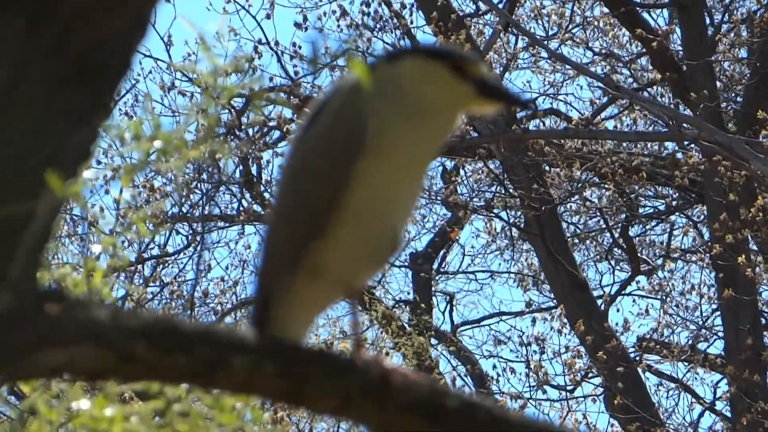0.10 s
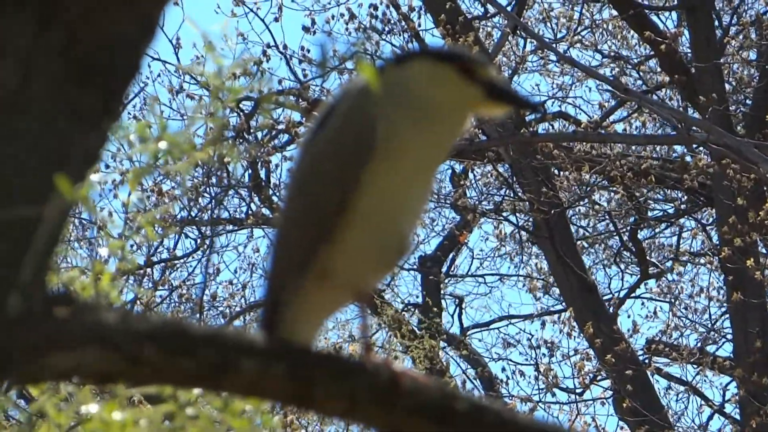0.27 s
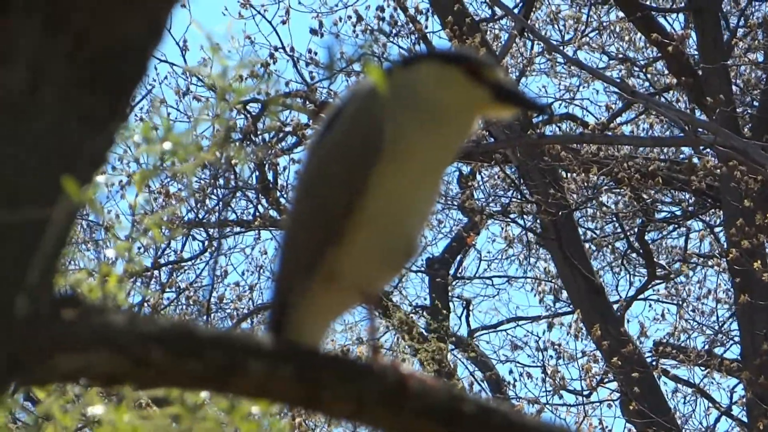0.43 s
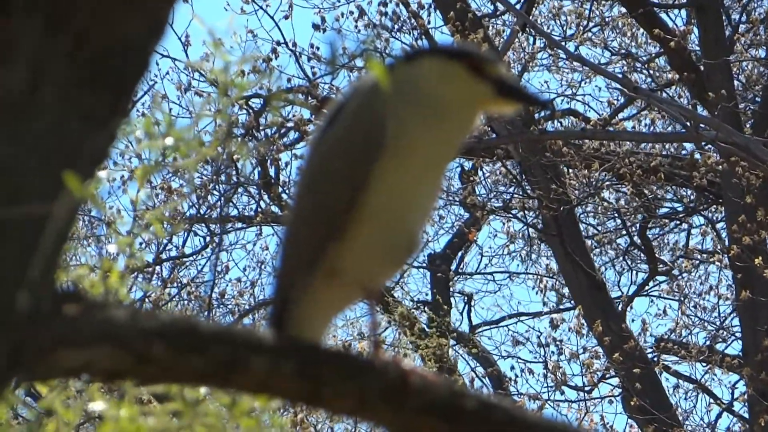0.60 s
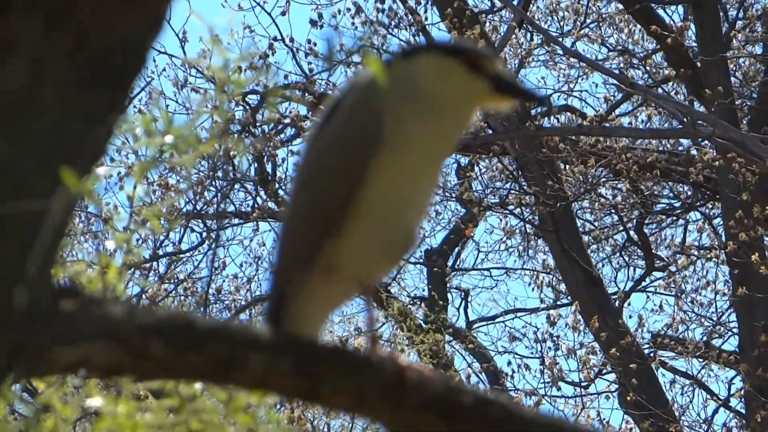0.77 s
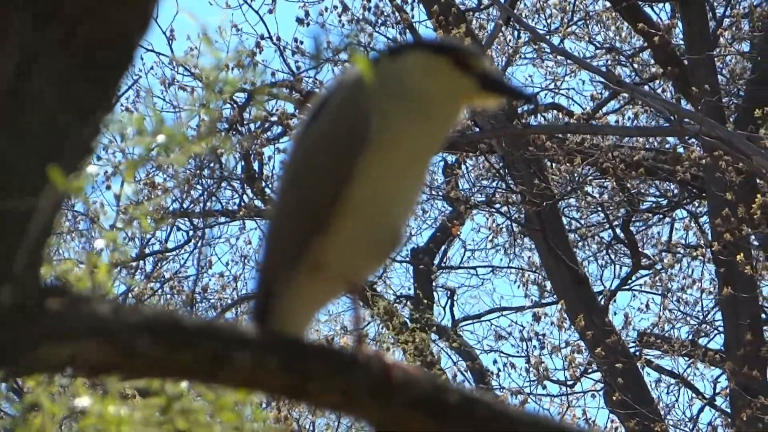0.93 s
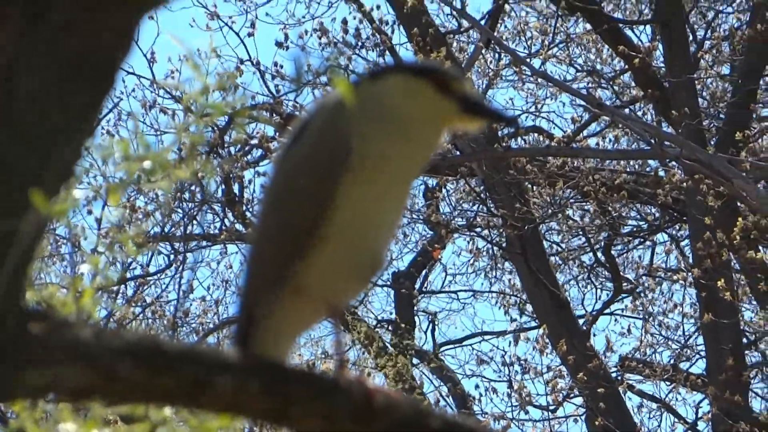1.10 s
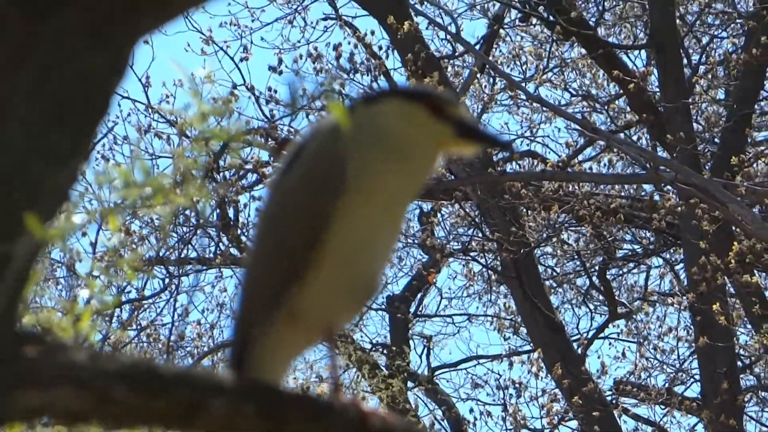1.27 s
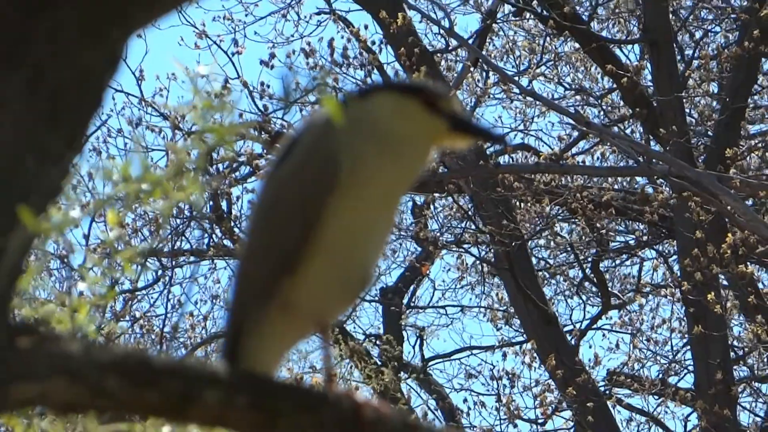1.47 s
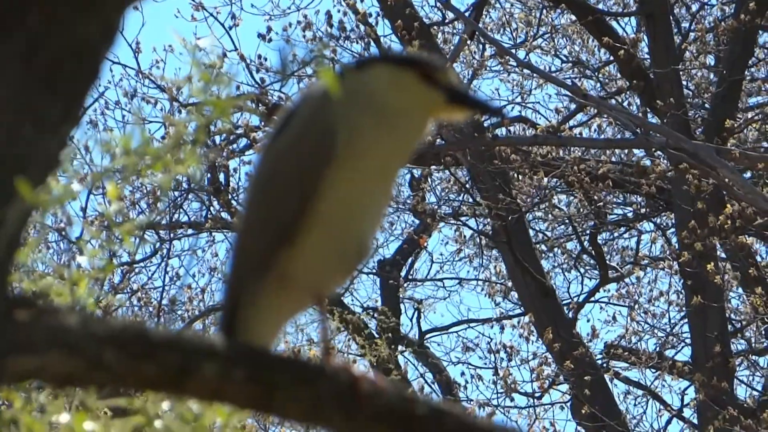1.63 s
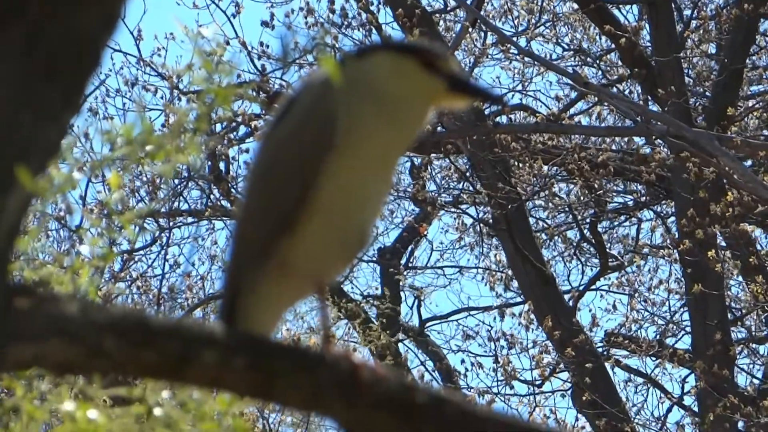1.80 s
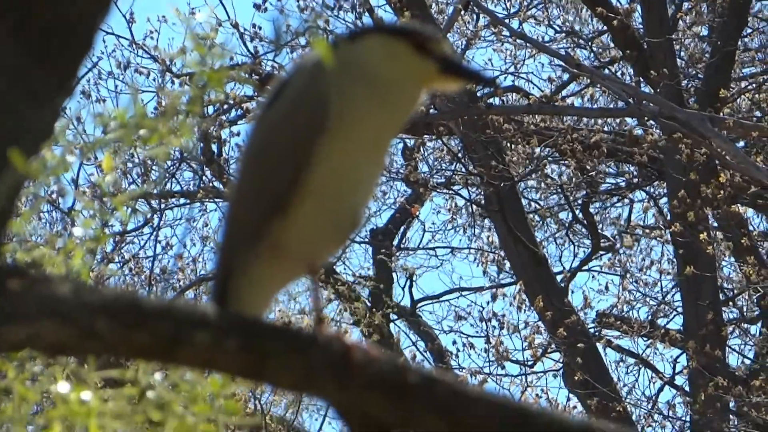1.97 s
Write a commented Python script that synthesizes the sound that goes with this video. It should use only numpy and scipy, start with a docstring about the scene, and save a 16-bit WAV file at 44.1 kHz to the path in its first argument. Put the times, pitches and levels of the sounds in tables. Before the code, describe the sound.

Thin high bird whistle slides down, another bird chips harshly, soft traffic hum behind in a park

```python
"""Two seconds in a town park: rumble, wavering hum and hiss, made of filtered noise, run throughout.
Faint far rasps come and go from the start; short gliding tones flick by before and during the whistle.
A small bird on the right gives a thin two-note falling whistle, a nearly pure tone with faint overtones.
A second bird, to the left, gives three harsh chips, each a buzzing tone in a puff of noise. Twigs then
tick as short noise bursts, faint pipes sound, and a fourth chip comes late. Trees scatter the calls."""
import sys
import numpy as np
from scipy import signal
from scipy.fft import rfft, irfft
from scipy.io import wavfile
from scipy.ndimage import uniform_filter1d, map_coordinates

SR = 44100
rng = np.random.default_rng(int(sys.argv[2]) if len(sys.argv) > 2 else 0)


def int16_out(signal):
    """Quantize to a 16-bit WAV file."""
    q = np.round(np.clip(np.atleast_2d(signal).T, -1, 1) * 32767)
    wavfile.write(sys.argv[1], SR, q.astype(np.int16))


def decibels_to_gain(level_db):
    """Convert a level in decibels to a linear amplitude gain (20 dB per decade)."""
    exponent = np.asarray(level_db, float) / 20
    return 10 ** exponent


N = 90404
T = np.arange(N) / SR  # time in seconds
F = np.maximum(np.fft.rfftfreq(N, 1 / SR), 1)  # frequencies of the spectrum in Hz

# Colour of the town noise, relative: pitch_hz, level_db
TOWN_COLOUR = [(13, -40.5), (22, -12.5), (106, -5), (194, -1.5), (366, -13), (672, -14), (837, -17),
               (961, -13.5), (1490, -21.5), (1810, -23.5), (2390, -28.5), (3150, -34.5), (4630, -39),
               (7190, -40.5), (16000, -52.5)]
# How strong the left-right difference of the town is beside its middle: pitch_hz, side_minus_mid_db
TOWN_WIDTH = [(60, -39), (110, -17.5), (200, -18), (380, -9.5), (700, -9), (1290, -8.5), (2380, -5.5),
              (4400, -5), (8120, -13.5), (15000, -24)]
# Slow swell of the town: time_s, middle_db, treble_db
TOWN_SWELL = [(0, 1, 2.5), (.3, 0, 3.5), (.7, 1.5, 1), (1.0, 0.5, 3.5), (1.249, 1, -0.5), (1.5, 1.5, -0.5),
              (1.75, -0.5, 2.5), (2.05, -1, 1.5)]
# Rise and fall of the low rumble, before a 3 dB cut: time_s, level_db
RUMBLE_LEVEL = [(0.0, -52), (0.14, -37.5), (1.02, -41), (1.03, -26), (1.4, -36), (1.43, -25.5),
                (1.46, -38.5), (2.05, -35)]
# Wavering hums: pitch_hz, width_hz, level_db
HUMS = [(125.8, 8.2, -51.5), (179.4, 3, -48.5), (226.7, 5.3, -48)]
# Faint far pipes: start_s, length_s, pitch_hz, level_db
FAR_PIPES = [(1.55, .065, 2690, -55), (2.02, .04, 2700, -52)]
# Harsh calls far away: start_s, length_s, centre_hz, width_hz, level_db
FAR_RASPS = [(0.018, 0.025, 3110, 1530, -50.5), (1.101, 0.033, 3020, 1600, -51.5),
             (1.319, 0.02, 3120, 1210, -57), (1.624, 0.039, 3280, 1540, -50),
             (1.387, 0.042, 1100, 600, -64), (1.61, 0.016, 6660, 5000, -56)]
# Glides of farther birds: start_s, length_s, from_hz, to_hz, level_db
GLIDES = [(.192, .010, 5400, 6700, -47), (.341, .010, 5200, 6700, -36)]
# Twig ticks: start_s, peak_db (before panning), centre_hz, width_hz, left_minus_right_db
TWIG_TICKS = [(1.272, -32, 5100, 3930, -7.5), (1.349, -19, 1390, 1530, -5), (1.364, -26.5, 2450, 1500, 12),
              (1.364, -24, 5100, 4900, -8), (1.408, -26.5, 1100, 586, 14), (1.582, -38, 4960, 2520, 0),
              (1.608, -38, 7100, 4000, 16), (1.612, -39, 8900, 9000, 0.5)]
# Harsh chips: peak_s, level_db, top_pitch_hz, rasp (0-1), tail_treble_db, top_hiss_db
# The last two are relative to the chip.
CHIP_CALLS = [(0.457, -14.5, 4430, 0.63, 14, -44.5), (.631, -13, 4150, 0.5, 7, -52),
              (.860, -14.5, 4300, 0.39, 11.5, -45), (1.786, -14.5, 4400, 0.61, 3.5, -31.5)]
# Colour of the rasping air in a chip, relative: pitch_hz, level_db
RASP_COLOUR = [(470, -60), (800, -18.5), (1240, -20.5), (2770, -21), (4240, -1.5), (4740, -13),
               (5510, -11.5), (7080, -29.5), (7730, -29), (14700, -47), (16000, -57)]
# Path of the whistle, smoothed when played: time_s, pitch_hz, level_db
WHISTLE_PATH = [(.2, 5640, -60), (.208, 5600, -33), (0.221, 5440, -33.5), (0.232, 5300, -17.5),
                (0.238, 5210, -34), (.246, 5120, -14.5), (0.259, 5144, -12.5), (0.271, 5065, -17),
                (0.285, 5076, -14), (0.295, 5037, -21.5), (0.303, 5020, -14), (0.309, 5024, -28),
                (0.314, 5044, -20.5), (0.339, 5125, -37), (0.361, 4957, -27), (0.382, 4970, -26.5),
                (.388, 4860, -15.5), (.400, 4850, -17), (0.433, 4858, -15.5), (0.447, 4855, -15),
                (.464, 4890, -30), (0.472, 4810, -15), (0.481, 4856, -19.5), (.5, 4875, -36)]

TOWN_DB, FLICKER_DB, TOWN_PAN_DB = -36, 1.88, -.8  # every pan is left minus right
RUMBLE_HZ, RUMBLE_WIDTH_HZ = 89, 106
UNEVEN_DB = 3  # rms flutter of overtones and pipes
TICK_S = 0.0016  # time for a tick to fall to 1/e
CHIP_RISE_S, CHIP_FALL_S, CHIP_PAN_DB = 0.01312, 0.0066, 7.5
CHIP_ARC_HZ, CHIP_BUZZ_HZ, CHIP_OCTAVE_DB = 1100, 900, -17
CHIP_TOP_HZ, CHIP_TOP_WIDTH_HZ = 14500, 2500
CHIP_ECHO_S, CHIP_ECHO_DB, CHIP_ECHO_HZ = .172, -26, 3600  # level ahead of the echo's filter
WHISTLE_PAN_DB, WAVER_HZ = -4.5, 13.5  # rms pitch waver
OVERTONES_DB, OVERTONES_FROM_S = (-30.5, -52), .228  # 2nd and 3rd partial
FAR_WALL_S, FAR_WALL_DB, FAR_WALL_PAN_DB = .37, -24, 2.5
# Scatter: t60 is the time for the tail to fall by 60 dB
ALIKE = 0.91  # share of the scatter common to left and right
TREES_T60_S, SONG_WET_DB, TREES_DULL_HZ = .6, -12.5, 9000
PARK_T60_S, PARK_DB, PARK_DULL_HZ = 1.2, -28, 6000
FAR_T60_S, FAR_WET_DB = .45, 3
SHEEN_HZ, SHEEN_WIDTH_HZ = 8800, 12400  # airy treble that the near leaves throw back
SHEEN_T60_S, SHEEN_DB = 0.28, -32
SWAY_HZ, SWAY_S = 200, 9e-5  # moving leaves wobble the path of scattered chips
TOP_HZ = 15750


def on_log(points):
    """Join (Hz, dB) points on a log pitch scale, giving dB at every frequency."""
    p = np.array(points)
    return np.interp(np.log(F), np.log(p[:, 0]), p[:, 1])


def shape(x, gain):
    """Filter by a gain for each frequency."""
    return irfft(rfft(x) * gain, N)


def unit(x):
    """Scale to rms 1."""
    return x / np.sqrt(np.mean(x ** 2))


def noise(gain):
    """Coloured noise of rms 1."""
    return unit(shape(rng.standard_normal(N), gain))


def bell(hz, width_hz):
    """A resonance: a peak that falls to half at half its width to either side."""
    return 1 / (1 + (2 * (F - hz) / width_hz) ** 2)


def pan(x, db):
    """Place a sound by its left minus right level."""
    return x * decibels_to_gain(np.array([[db / 2], [-db / 2]]))


def tone(hz, multiple=1):
    """Sine of rms 1 that follows a pitch, by adding up its phase."""
    return np.sqrt(2) * np.sin(2 * np.pi * multiple * np.cumsum(hz) / SR)


def hump(start_s, length_s):
    """A smooth half-sine swell, silent outside its length."""
    return np.sin(np.pi * np.clip((T - start_s) / length_s, 0, 1))


def town():
    """Broad traffic noise, wider in the treble, flickering by band, with a swelling rumble and hum."""
    gain = decibels_to_gain(on_log(TOWN_COLOUR))
    side_gain = decibels_to_gain(on_log(TOWN_WIDTH))
    mid, side = (rng.standard_normal(N) for _ in range(2))
    when, middle_db, treble_db = np.array(TOWN_SWELL).T
    hiss = np.zeros((2, N))
    for octave in np.arange(4, 15):
        # Overlapping bands, centred on 2 ** octave Hz
        band = gain * np.clip(1 - abs(np.log2(F) - octave), 0, 1)
        wide = shape(side, band * side_gain) * np.array([[1], [-1]])
        swell_db = np.interp(T, when, middle_db * (6.5 < octave < 11.5) + treble_db * (octave > 11.5))
        flicker_db = FLICKER_DB * noise(bell(0, 14.4))
        hiss += decibels_to_gain(swell_db + flicker_db) * (shape(mid, band) + wide)
    hiss *= decibels_to_gain(TOWN_DB) / np.std(shape(mid, gain))

    s, db = np.array(RUMBLE_LEVEL).T
    rumble_colour = bell(RUMBLE_HZ, RUMBLE_WIDTH_HZ) / (1 + (35 / F) ** 4)
    rumble = decibels_to_gain(np.interp(T, s, db) - 3) * noise(rumble_colour)
    # Noise in a narrow band wavers like an unsteady tone
    hum = sum(decibels_to_gain(level_db) * noise(bell(hz, width_hz)) for hz, width_hz, level_db in HUMS)
    return pan(hiss + rumble + hum, TOWN_PAN_DB)


def pipes():
    """Soft steady-pitched tones whose level flutters a little."""
    out = np.zeros(N)
    for s, length, hz, db in FAR_PIPES:
        level = decibels_to_gain(db + UNEVEN_DB * noise(bell(0, 100)))
        out += level * hump(s, length) * tone(hz + 0 * T)
    return out


def far_calls():
    """Far rasps: bands of noise under a smooth swell."""
    out = np.zeros(N)
    for s, length, hz, width_hz, db in FAR_RASPS:
        out += decibels_to_gain(db) * hump(s, length) * noise(bell(hz, width_hz) ** 2)
    return out


def sweeps():
    """Short tones gliding evenly in pitch under a smooth swell."""
    out = np.zeros(N)
    for s, length, from_hz, to_hz, db in GLIDES:
        progress = np.clip((T - s) / length, 0, 1)
        out += decibels_to_gain(db) * hump(s, length) * tone(from_hz + (to_hz - from_hz) * progress)
    return out


def ticks():
    """Cracks of dry wood: noise that dies away in milliseconds, through a resonance."""
    out = np.zeros((2, N))
    for s, db, hz, width_hz, pan_db in TWIG_TICKS:
        decay = (T >= s) * np.exp(-np.clip(T - s, 0, None) / TICK_S)
        crack = shape(decay * rng.standard_normal(N), bell(hz, width_hz))
        out += pan(decibels_to_gain(db) * crack / abs(crack).max(), pan_db)
    return out


def chips():
    """An arched tone, buzzing unevenly, in rasping air; also the treble puff that feeds the tail."""
    out, air = np.zeros(N), np.zeros(N)
    for s, db, top_hz, rasp, treble_db, top_db in CHIP_CALLS:
        # -1 at the start, 0 at the peak, 1 at the end
        u = np.clip((T - s) / np.where(T < s, CHIP_RISE_S, CHIP_FALL_S), -1, 1)
        env = decibels_to_gain(db) * (1 - abs(u)) ** 0.93
        buzz_hz = CHIP_BUZZ_HZ * (1 + 0.41 * noise(bell(0, 301.3)))
        buzz = 1 + rasp * tone(buzz_hz)
        pitch = top_hz - CHIP_ARC_HZ * abs(u) ** 1.432
        octave = decibels_to_gain(CHIP_OCTAVE_DB) * tone(pitch, 2) * noise(bell(0, 1000))
        voice = (tone(pitch) + octave) * buzz
        rasping = noise(decibels_to_gain(on_log(RASP_COLOUR)))
        top_hiss = decibels_to_gain(top_db) * noise(bell(CHIP_TOP_HZ, CHIP_TOP_WIDTH_HZ) ** 2)
        out += env * ((1 - rasp) * voice + rasp * rasping + top_hiss)
        air += env * decibels_to_gain(treble_db) * noise(bell(SHEEN_HZ, SHEEN_WIDTH_HZ) ** 2)
    return out, air


def whistle():
    """A nearly pure tone with a wavering pitch; two faint, rougher overtones join a little later."""
    s, hz, db = np.array(WHISTLE_PATH).T
    pitch = uniform_filter1d(np.interp(T, s, hz), size=400) + WAVER_HZ * noise(bell(0, 110))
    fade = np.clip(np.minimum(T - s[0], s[-1] - T) / .004, 0, 1)
    env = decibels_to_gain(uniform_filter1d(np.interp(T, s, db), size=60)) * fade
    # The overtones rise and fall half as far in dB as the main tone
    join = np.clip((T - OVERTONES_FROM_S) / 0.00936, 0, 1)
    soft = np.sqrt(env * env.max()) * join * decibels_to_gain(UNEVEN_DB * noise(bell(0, 151.3)))
    overtones = sum(decibels_to_gain(d) * tone(pitch, k + 2) for k, d in enumerate(OVERTONES_DB))
    return env * tone(pitch) + soft * overtones


def scatter(x, t60, db, dull_hz):
    """Dense reflections as dying noise, dulled in the treble and partly different left and right."""
    decay = 1000 ** (-T / t60) * np.clip(T / .006, 0, 1)
    tails = np.array([noise(1 / (1 + (F / dull_hz) ** 2)) for _ in range(3)]) * decay
    common, own = tails[2], tails[:2]
    mixed = np.sqrt(ALIKE) * common + np.sqrt(1 - ALIKE) * own
    mixed = mixed / np.sqrt(np.sum(common ** 2))
    return decibels_to_gain(db) * signal.fftconvolve(x[None], mixed, axes=1)[:, :N]


def sway(x):
    """Moving leaves change the path length: read both channels at a slightly wobbling delay."""
    at = (T + SWAY_S * noise(bell(0, SWAY_HZ) ** 2)) * SR
    return np.array([map_coordinates(c, [at], mode="nearest") for c in x])


def scene():
    """Add up the calls, their echoes among the trees and off far walls, and the town."""
    song = whistle()
    chip, air = chips()
    far = sweeps() + far_calls()
    tick = ticks()

    wall = decibels_to_gain(FAR_WALL_DB) * np.interp(T - FAR_WALL_S, T, song)
    late_chip = np.interp(T - CHIP_ECHO_S, T, chip)
    echo = decibels_to_gain(CHIP_ECHO_DB) * shape(late_chip, bell(CHIP_ECHO_HZ, 2900))

    sent = song + wall
    wet = scatter(sent, TREES_T60_S, SONG_WET_DB, TREES_DULL_HZ)
    wet += scatter(sent, PARK_T60_S, PARK_DB, PARK_DULL_HZ)
    wet += scatter(far, FAR_T60_S, FAR_WET_DB, TREES_DULL_HZ)
    chip_wet = scatter(chip + 1.9 * echo + .5 * tick.mean(axis=0), 0.36, -8, 8000)
    chip_wet += scatter(chip, 0.52, -21, 6100)
    wet += 0.97 * pan(sway(chip_wet), 2.7)
    wet += scatter(air, SHEEN_T60_S, SHEEN_DB, 14000)

    direct = pan(song, WHISTLE_PAN_DB) + pan(chip, CHIP_PAN_DB) + far + tick
    echoes = pan(wall, FAR_WALL_PAN_DB) + echo + wet
    return direct + echoes + pipes() + town()


def low_pass(x):
    """Removes everything above the highest recorded frequency."""
    return signal.sosfilt(signal.butter(12, 16390, fs=SR, output="sos"), x)


def record(dry):
    """Cut everything from the top limit upward and finish the mix."""
    mix = shape(dry, F < TOP_HZ)
    return low_pass(mix)


dry = scene()
out = record(dry)
int16_out(out)
```